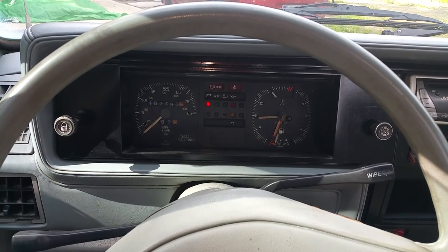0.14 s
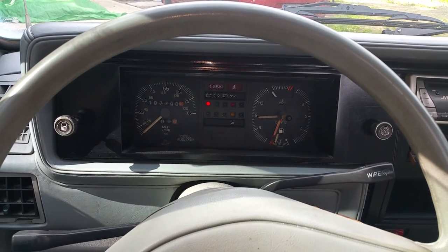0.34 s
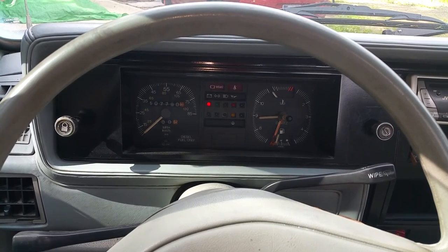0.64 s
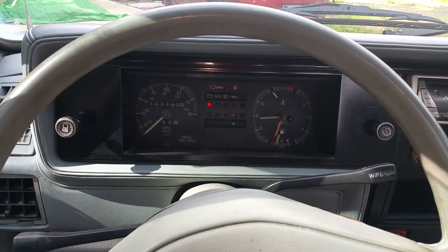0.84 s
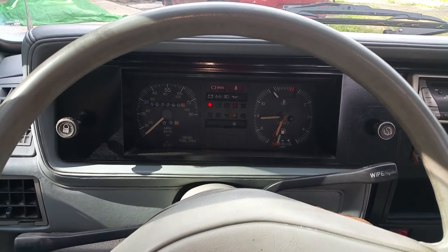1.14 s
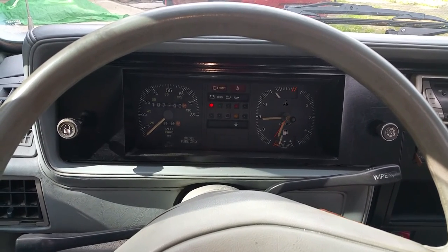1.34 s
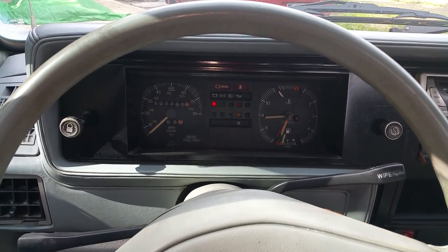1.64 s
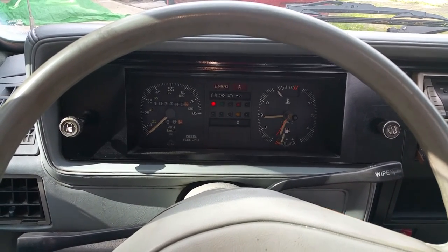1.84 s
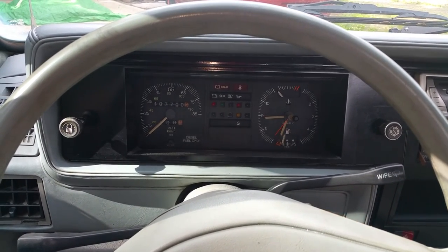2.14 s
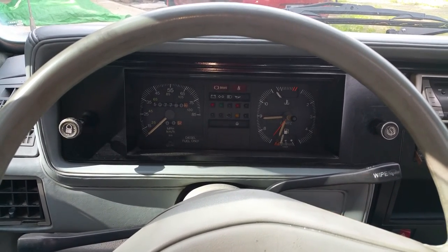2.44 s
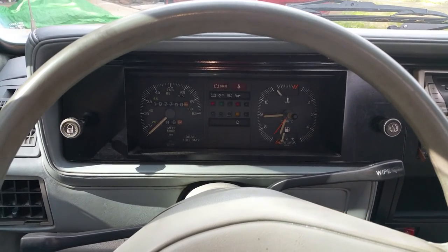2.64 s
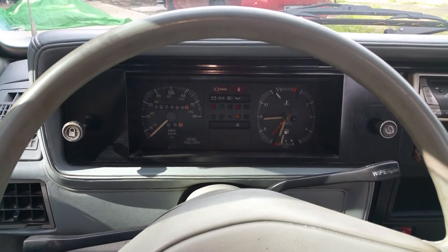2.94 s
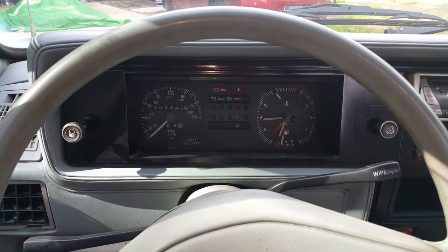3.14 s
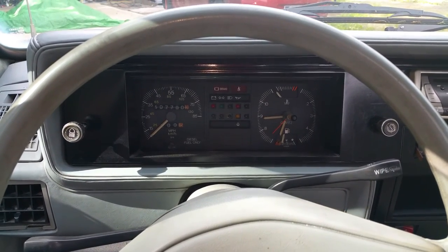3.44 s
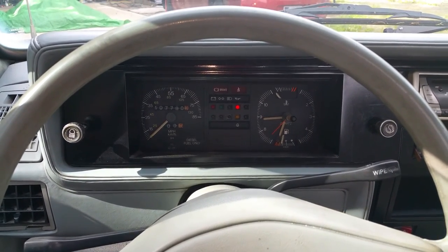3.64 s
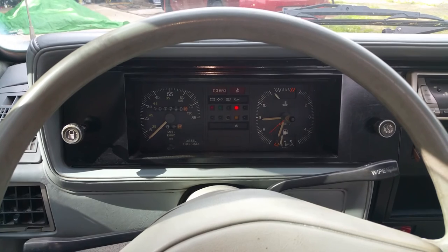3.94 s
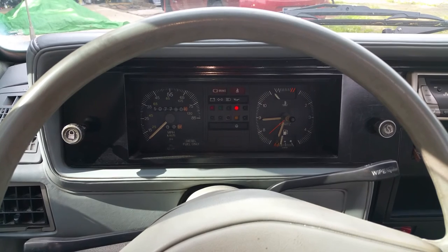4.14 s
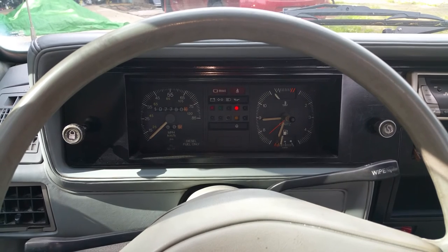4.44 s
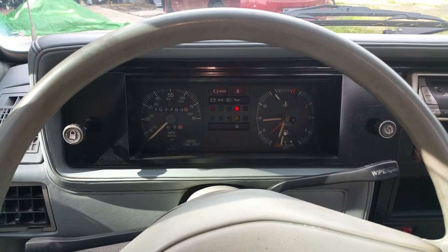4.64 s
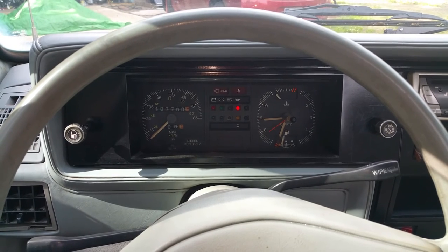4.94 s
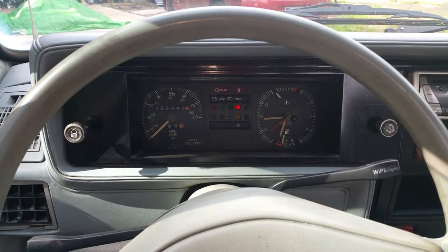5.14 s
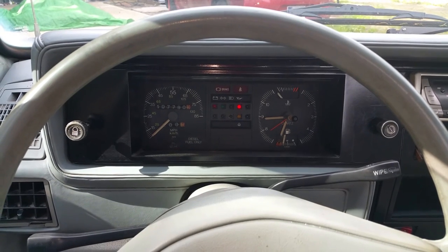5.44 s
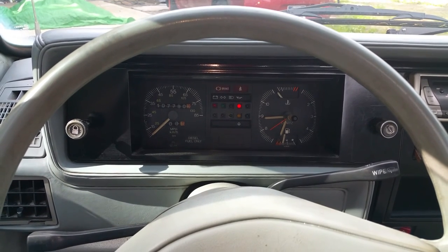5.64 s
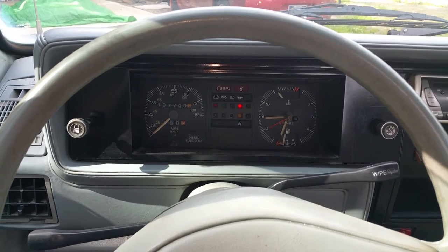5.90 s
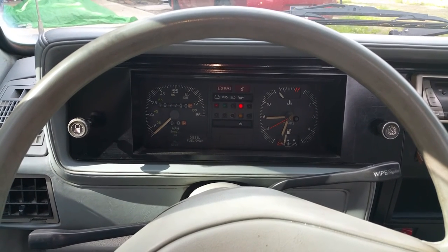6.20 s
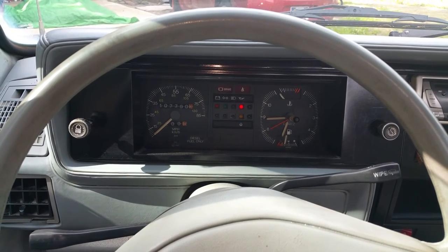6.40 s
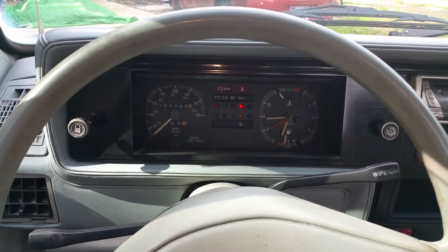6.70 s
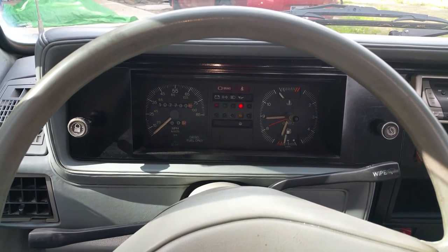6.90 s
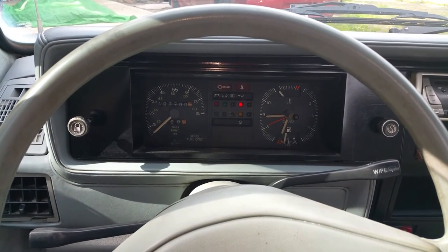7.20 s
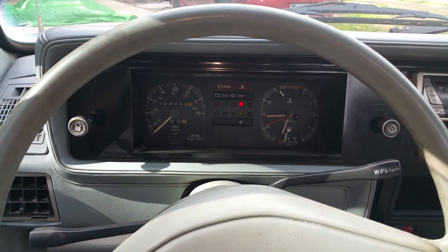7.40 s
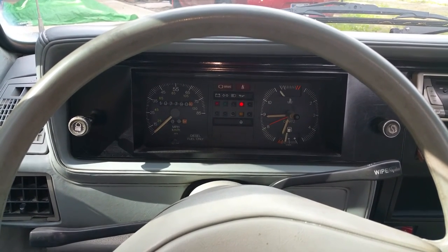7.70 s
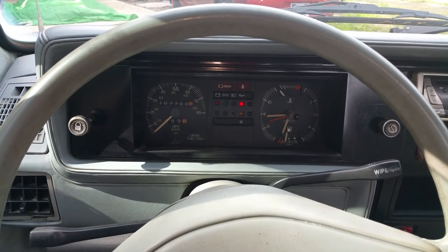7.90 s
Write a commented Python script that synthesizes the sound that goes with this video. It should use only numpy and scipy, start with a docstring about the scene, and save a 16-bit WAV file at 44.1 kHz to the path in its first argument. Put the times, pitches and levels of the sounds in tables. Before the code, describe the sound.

In a quiet car cabin, the ignition key clicks and the starter whirrs briefly. A small diesel engine catches with heavy thumps as the keys jingle lightly. The revs rise with a low boom, clatter and a faint turbo whistle, then fall back and ease into a steady, knocking idle. Everything is heard from the driver's seat, with the key close by and the engine ahead.

```python
"""A small turbo-diesel four starts up, heard from the driver's seat on a two-port microphone.
Close by, the dash clock ticks over a faint far-off hum, the key turns and the loose keys jingle.
The starter whirrs; cranking jolts, then the first firings, thump through the body. Then the firing
orders boom in the cabin over diesel clatter and a turbo whistle while the revs rise, drop and settle."""
import sys
import numpy as np
from scipy import signal
from scipy.fft import rfft, irfft, next_fast_len
from scipy.io import wavfile
from scipy.ndimage import uniform_filter1d

SR = 44100
rng = np.random.default_rng(int(sys.argv[2]) if len(sys.argv) > 2 else 0)


def int16_out(signal):
    """Quantize to a 16-bit WAV file."""
    q = np.round(np.clip(np.atleast_2d(signal).T, -1, 1) * 32767)
    wavfile.write(sys.argv[1], SR, q.astype(np.int16))


N = 355446

# panel resonances and cabin nulls at the seat: f/Hz, width/Hz, lift/dB
PANELS = [(410, 40, -5), (478, 35, 5), (540, 35, -6), (620, 60, 3), (715, 60, 4), (840, 55, -8),
          (930, 90, 6), (1210, 50, -4), (1380, 60, -8), (1445, 40, 3), (1600, 90, 4), (1790, 60, -8),
          (2000, 90, 3), (2060, 40, -4), (2325, 90, -5), (2670, 60, 7), (2840, 60, -6), (2970, 60, -6),
          (3100, 60, 5), (3190, 50, -5), (3295, 70, 5), (3445, 60, -5), (3850, 120, 3), (5600, 70, 5),
          (6225, 120, 6)]
# mechanical noise through the bulkhead: t/s, clatter/dB, body rumble/dB
BULKHEAD = [(1.38, -60, -46), (1.42, -37, -27), (1.47, -46.5, -33.5), (1.55, -49.5, -41),
            (1.62, -44.5, -33.5), (1.7, -45.5, -31), (1.78, -46.5, -27.5), (1.95, -31.5, -49),
            (2.15, -30.5, -37), (2.8, -28, -36.5), (3.4, -32, -38), (3.6, -30.5, -45.5), (5., -32, -40.5),
            (8.06, -32.5, -37.5)]
# turbo speed, lagging the engine: t/s, whistle/Hz
TURBO = [(2.35, 1150), (2.62, 1640), (2.78, 1980), (2.87, 2120), (3.03, 2310), (3.3, 2500), (3.5, 2530),
         (3.75, 2400), (4.0, 2145), (4.14, 2015), (4.35, 1890), (4.85, 1650), (5.2, 1600), (5.85, 1590),
         (6.1, 1520), (6.35, 1440), (6.8, 1250), (7.05, 1180)]


def undb(db):
    return 10 ** (np.asarray(db) / 20)


def curves(rows):
    """Columns of a time table, one value a sample."""
    s, *columns = np.transpose(rows)
    return [np.interp(np.arange(N) / SR, s, c) for c in columns]


def at_hz(hz, points, column=1):
    """Value of a spectrum table on a log frequency axis."""
    points = np.array(points)
    return np.interp(np.log(np.maximum(hz, 1)), np.log(points[:, 0]), points[:, column])


def fade_in(start_s, length_s):
    return np.clip((np.arange(N) / SR - start_s) / length_s, 0, 1)


def attack(t, length_s):
    return np.minimum(t / length_s, 1)


def decay(t, t60):
    return np.exp(-np.log(1000) * t / t60)


def add(out, s, sound):
    i = int(s * SR)
    out[..., i:i + sound.shape[-1]] += sound


def walk(rate):
    """Random levels held 1 / rate s and slewed twice; spread near 1."""
    step = 32
    hold = int(SR / rate / step)
    held = np.repeat(rng.standard_normal(N // (hold * step) + 2), hold)
    slewed = uniform_filter1d(uniform_filter1d(held, hold), hold)
    return 1.3 * np.interp(np.arange(N), step * np.arange(len(held)), slewed)


def resonance_db(hz, peaks):
    return sum(lift / (1 + (2 * (hz - f) / width) ** 2) for f, width, lift in peaks)


def band(hz, centre, width):
    return 1 / (1 + ((hz / centre - centre / hz) / width) ** 2)


def lift_band(x, db, hz, kind):
    part = signal.sosfiltfilt(signal.butter(3, hz, kind, fs=SR, output="sos"), x)
    return x + (undb(db) - 1) * part


def noise(spectrum, peaks=(), drive=None):
    """Common, left and right noise (or a given drive) in one colour, rms 1."""
    hz = np.fft.rfftfreq(N, 1 / SR)
    if drive is None:
        drive = rng.standard_normal((3, N))
    x = irfft(rfft(drive) * undb(at_hz(hz, spectrum) + resonance_db(hz, peaks)), N)
    return x / x.std()


def breathy_tone(rows, response):
    """A tone that wavers in pitch and level, heard only over the span of its table."""
    hz, *levels_db = curves(rows)
    db = sum(levels_db) + at_hz(hz, response)
    on = fade_in(rows[0][0], .03) * (1 - fade_in(rows[-1][0], .03))
    waver, flutter_db = .019 * walk(150), 3.3 * walk(110)
    return on * undb(db + flutter_db) * np.sin(2 * np.pi * np.cumsum(hz * (1 + waver)) / SR)


def cabin_air():
    """The quiet of the cabin, with a far-off hum in it."""
    # noise floor: f/Hz, relative density/dB
    floor = [(15, -13.5), (35, -21.5), (60, -8), (120, -12.5), (170, -20.5), (300, -21.5), (600, -26),
             (1500, -30.5), (4500, -38), (15800, -39.5)]
    # far-off hum: f/Hz, width/Hz, lift/dB
    hum = [(68, 10, 6.5), (97, 11, -4), (131, 26, 13), (206, 21, 10)]
    return noise(floor, hum) * undb(-63 + 0.59 * walk(4.1))


def clicks(rows):
    """Dry bursts of noise ring the modes of lock and dash; the dash answers with a low clunk."""
    # modes of lock and dash: f/Hz, width/Hz, lift/dB
    modes = [(980, 71, 16.5), (1810, 150, 6), (2840, 530, 4.5), (3644, 1100, 6.5), (4300, 200, 2),
             (4900, 180, -0.5), (6340, 260, -2), (6340, 300, 6.5)]
    # edge, knock, body and body overtone of a click: f/Hz, width/ratio
    parts = [(11300, 0.64), (1520, 0.98), (266, 0.078), (486, 0.87)]
    out, t = np.zeros((3, N + SR)), np.arange(SR // 4) / SR
    hz = np.maximum(np.fft.rfftfreq(len(t), 1 / SR), 1)
    colour = undb(resonance_db(hz, modes))
    for s, snap_db, snap_hz, knock_db, body_db, t60 in rows:
        rise = attack(t, 0.0027)
        edge_db = snap_db - 6.5 + 12 * np.log2(snap_hz / 5500)  # higher snaps have more edge
        levels_db = snap_db, edge_db, knock_db, body_db, body_db - 5
        for db, (f, width) in zip(levels_db, [(snap_hz, 0.62), *parts]):
            if f < 600:  # the body is tonal and outlasts the snap
                clunk = np.sin(2 * np.pi * f * (1 + 0.052 * rng.standard_normal()) * t)
                add(out, s, undb(db) * rise * decay(t, 1.6 * t60) * clunk)
                continue
            burst = irfft(rfft(rng.standard_normal((3, len(t)))) * colour * band(hz, f, width), len(t))
            ring = 0
            for mode_hz, _, lift in modes:
                luck, detune = rng.standard_normal(2)
                gain = undb(-12.5 + lift + 3.3 * luck) * band(mode_hz, f, width) ** 2
                ring += gain * np.sin(2 * np.pi * mode_hz * (1 + .01 * detune) * t)
            click = decay(t, t60) * burst / burst.std() + decay(t, 0.92 * t60) * ring
            add(out, s, undb(db) * rise * click)
    return out[:, :N]


def dash_clock():
    """The clock ticks faintly in the dash once a second."""
    # one tick: snap/dB, snap/Hz, knock/dB, body/dB, t60/s
    tick = (-65, 3591, -58.5, -65, 0.092)
    return clicks([(s, *tick) for s in np.arange(0.035, N / SR, 1.0)])


def ignition():
    """Key, lock and relays click at arm's length."""
    # clicks: t/s, snap/dB, snap/Hz, knock/dB, body/dB, t60/s
    contacts = [(1.257, -72, 2500, -51, -53, 0.037), (1.274, -62, 3200, -51.5, -60, 0.11),
                (1.306, -67, 3000, -50, -58, 0.053), (1.3165, -39, 4600, -41.5, -33, 0.082),
                (1.344, -34.5, 5800, -32, -46, 0.075), (1.3675, -48, 6070, -43, -40, 0.061),
                (1.384, -52, 5000, -53, -47, 0.082), (1.4, -53, 5000, -38.5, -48, 0.049),
                (1.4132, -60, 3000, -31.5, -27.5, 0.05), (1.555, -59, 5300, -60, -51.5, 0.11),
                (1.6758, -66, 4040, -41.5, -38.5, 0.088), (1.8707, -29.5, 5100, -24.5, -27.5, 0.1),
                (1.885, -30, 3400, -23.5, -26.5, 0.041), (1.9348, -46, 5000, -36, -35, 0.15),
                (1.961, -38, 5560, -33, -30.5, 0.11), (1.985, -47, 4000, -40, -32, 0.071),
                (2.06, -49, 5930, -36, -30, 0.11), (2.07, -48, 6000, -40.5, -39, 0.18),
                (2.0941, -40, 5200, -29, -22.5, 0.049), (2.1073, -35, 4590, -36, -36, 0.082),
                (2.14, -57.5, 5500, -52, -45, .15), (2.185, -57, 5500, -49.5, -44.5, .12),
                (2.234, -50.5, 4500, -52, -35.5, 0.1), (2.262, -53, 3960, -41, -42.5, 0.036)]
    return clicks(contacts)


def keys():
    """Loose keys ring where they touch; each touch favours other modes, and fingers damp most."""
    # modes of the keys: f/Hz, level/dB, t60/s
    modes = [(5440, -6, .1), (6300, 2, .05), (6980, 6, 0.13), (7860, -8, .1), (8620, -5, 0.12),
             (10070, -1, 0.2), (10800, 5, .06), (11480, 2, .04), (12680, -2, .22), (13890, -1, 0.17),
             (14220, -2, .1)]
    # keys touch: t/s, level/dB, ring time/ratio
    touches = [(1.345, -64, .3), (1.871, -54, .3), (1.937, -64, .5), (1.958, -50.5, 1.2), (2.066, -47, .25),
               (2.108, -48, 0.26)]
    out, t = np.zeros((3, N)), np.arange(SR // 4) / SR
    for s, db, free in touches:
        for (hz, mode_db, t60), (luck, detune) in zip(modes, rng.standard_normal((len(modes), 2))):
            phase = 0.49 * rng.standard_normal((3, 1))
            tone = np.sin(2 * np.pi * hz * (1 + 0.0034 * detune) * t + phase)
            add(out, s, undb(db + mode_db + 1.5 * luck) * tone * decay(t, t60 * free) * attack(t, 0.0018))
    return out


def valve_gear(firings):
    """Valves, injectors and gears strike alike every four firings; the pattern drifts slowly."""
    size = 2048
    patterns = irfft(np.exp(2j * np.pi * rng.random((2, 3, size // 2 + 1))), size)
    place = firings / 4 % 1 * size
    first, second = ([np.interp(place, np.arange(size), p, period=size) for p in trio]
                     for trio in patterns)
    drift = 0.72 * walk(3.185)
    drive = np.cos(drift) * first + np.sin(drift) * second
    return drive / drive.std()


def clatter(firing_hz, firings):
    """Each firing knocks and dies into the valve-gear noise; revs and turbo speed tilt the treble."""
    # diesel clatter: f/Hz, relative density/dB
    spectrum = [(150, -28.5), (250, -11), (350, -12.5), (600, -15), (850, -19), (1350, -22.5), (2000, -28),
                (2750, -34), (3500, -41.5), (4400, -50), (7000, -53.5), (9000, -60), (15800, -61)]
    # knock of each cylinder: level/dB
    cylinders = [1.5, -2, -1.5, -3]
    # colour against engine speed: firing rate/Hz, brightness/dB, added rasp/dB
    colour = [(9.55, -5, 10.5), (13.4, 4, 11), (34, -2.5, 14), (41.4, -9, 15), (52.1, -1, -0.5),
              (56.3, 1, -2), (70, -1, 0)]
    # the rasp opens with the revs, dips at the fuel cut and swells once more: t/s, lift/dB
    rasp = [(2.3, 1.5), (2.65, 0.5), (2.9, 5), (3.3, 6.5), (3.52, 0.5), (3.62, 3.5), (3.85, 5),
            (3.98, -0.5), (4.4, -.5), (8.06, 0)]
    repeat = 0.3  # share of the power that comes back alike in every cycle
    drive = np.sqrt(repeat) * valve_gear(firings) + np.sqrt(1 - repeat) * rng.standard_normal((3, N))
    count = firings.astype(int)
    strength = undb(rng.standard_normal(count[-1] + 1)[count] + np.take(cylinders, count, mode="wrap"))
    pulses = uniform_filter1d(1 + 0.52 * strength * np.exp(-(firings % 1) / 1.4), 40)
    x = noise(spectrum, PANELS, drive * pulses * undb(0.68 * walk(25)))
    boost = (curves(TURBO)[0] / 2830) ** 2.8
    x = lift_band(x, at_hz(firing_hz, colour) + 5 * boost, 1250, "high")
    x = lift_band(x, at_hz(firing_hz, colour, column=2) - 5.5 * boost, 3280, "high")
    return lift_band(x * undb(curves(BULKHEAD)[0]), curves(rasp)[0], (3350, 4500), "band")


def rumble():
    """The working engine shakes the body around the seat."""
    # body rumble: f/Hz, relative density/dB
    spectrum = [(8.8, -36), (15, -11), (59, -6.5), (78, 0.5), (102, 1), (197, -4), (255, -22), (294, -3.5),
                (348, -15), (450, -24), (580, -45), (990, -120)]
    return noise(spectrum) * undb(curves(BULKHEAD)[1])


def hard_knocks():
    """Single hard engine knocks, from starter engagement onward: short bursts that ring the block."""
    # knocks: t/s, level/dB
    blows = [(1.402, -32.5), (1.678, -38.5), (1.714, -29), (1.744, -23.5), (1.79, -21.5), (1.842, -20),
             (1.9, -25), (1.933, -23.5), (1.986, -25.5), (2.024, -29), (2.051, -31), (2.095, -31),
             (2.18, -35.5), (3.569, -29.5), (4.997, -34.5), (7.842, -36)]
    # ring of the block: f/Hz, relative density/dB
    spectrum = [(150, -8.5), (350, 11), (600, -10), (980, -3.5), (1350, -7), (1950, -10), (2800, -26.5),
                (4500, -32.5), (9000, -51), (15800, -58.5)]
    envelope, t = np.zeros(N), np.arange(SR // 8) / SR
    for s, db in blows:
        add(envelope, s, undb(db) * np.exp(-t / 0.021) * attack(t, 0.0012))
    return envelope * noise(spectrum, PANELS)


def starter():
    """The pinion whirrs on the ring gear with a stack of overtones."""
    # gear mesh, sagging as a piston is hauled through compression: t/s, f/Hz, level/dB
    mesh = [(1.43, 300, -52), (1.47, 322, -49), (1.55, 324, -54), (1.585, 264, -54), (1.61, 262, -50),
            (1.635, 335, -52), (1.67, 305, -53), (1.7, 320, -56)]
    # colour of the housing: f/Hz, gain/dB
    housing = [(260, 3), (330, 5), (520, -1), (680, 2), (800, -2), (980, 0), (1060, -2), (1300, -10),
               (1570, -4), (1680, -14), (2000, -24)]
    return sum(breathy_tone(np.array(mesh) * [1, k, 1], housing) for k in range(1, 7))


def start_thumps():
    """Cranking jolts, then the first firings, shake the body: a low ring, its overtone, a slow heave."""
    # thumps: t/s, level/dB, f/Hz
    thumps = [(1.431, -28.5, 54.6), (1.452, -23, 61), (1.499, -23, 74), (1.571, -25.5, 53.4),
              (1.597, -30, 98.5), (1.711, -14.5, 61), (1.741, -11.5, 86.4), (1.782, -9.5, 100),
              (1.817, -7.5, 75), (1.841, -6.5, 103), (1.867, -7, 67.6), (1.901, -6.5, 88),
              (1.922, -10.5, 62.4), (1.95, -7, 77.3), (1.969, -8.5, 103), (1.987, -11, 80.3),
              (2.021, -8.5, 93.4), (2.048, -6.5, 78.6), (2.067, -4.5, 83.7)]
    out, t = np.zeros(N), np.arange(SR // 4) / SR
    for s, db, hz in thumps:
        ring = -np.sin(2 * np.pi * hz * t) * (t / 0.0069) * np.exp(1 - t / 0.0068)
        overtone = -.45 * np.sin(2 * np.pi * 1.6 * hz * t) * np.exp(-t / 0.021)
        heave = 0.084 * np.sin(2 * np.pi * 25 * t) * np.exp(-t / .05)
        add(out, s, undb(db) * (ring + overtone + heave) * attack(t, 0.0019))
    return out


def cabin_boom(firing_hz, firings, load):
    """Five firing orders boom in the cabin, each as loud as its pitch and the load make it."""
    # boom under load: f/Hz, level/dB
    loaded = [(42, -25.5), (60, -17.5), (68, -17), (71.5, -13), (75, -17.5), (107, -18.5), (128, -19),
              (137, -12), (143, -23), (149, -18.5), (160, -24.5), (186, -13.5), (202, -21.5), (214, -20),
              (226, -21.5), (248, -34), (265, -27), (283, -24), (297, -16), (310, -21), (336, -27),
              (356, -33), (372, -40.5)]
    # boom off load: f/Hz, level/dB
    unloaded = [(51, -27), (55, -27.5), (59, -23), (63, -21.5), (68, -23), (105, -50.5), (118, -41),
                (125, -35.5), (136, -22), (156, -55), (161, -35.5), (165, -33), (170, -36.5), (178, -27.5),
                (190, -24.5), (202, -31), (220, -30), (238, -34.5), (250, -41), (268, -32.5), (280, -26.5),
                (295, -19.5), (303, -16), (312, -26.5), (340, -30)]
    # orders one to five: gain/dB
    orders = [0, 0, 0, -5, -17]
    # the third order thins out towards idle: t/s, gain/dB
    third = [(6.72, 0), (6.8, -12)]
    out = 0
    for order, db in enumerate(orders, 1):
        hz = order * firing_hz
        db += load * at_hz(hz, loaded) + (1 - load) * at_hz(hz, unloaded)
        if order == 3:
            db += curves(third)[0]
        flutter_db = 0.58 * walk(12) + 0.78 * walk(45)
        phase = 2 * np.pi * order * firings + 0.51 * walk(6) + 0.52 * (order - 1) ** 2
        out += np.sqrt(2) * undb(db + flutter_db) * np.cos(phase)
    return out


def uneven_orders(firing_hz, firings):
    """Unequal cylinders add wandering orders between and above the main five."""
    # quarter, half and upper whole orders: f/Hz, level/dB
    spectrum = [(14, -56.5), (28, -39.5), (42, -59), (60, -41), (90, -44), (130, -39.5), (160, -42),
                (200, -38.5), (250, -55.5), (290, -36), (330, -51), (365, -51), (410, -52), (455, -53),
                (484, -47), (520, -55), (550, -56), (590, -48.5), (625, -52), (660, -57.5), (710, -48),
                (760, -50.5), (830, -61), (925, -58), (1000, -62), (1150, -68.5), (1400, -76.5)]
    # low orders grow with the revs: f/Hz, slope/(dB per Hz of firing rate)
    growth = [(300, .5), (600, 0.45), (1000, -0.26)]
    step, out = 8, 0  # low tones, built at an eighth of the sample rate
    firing_hz, firings = firing_hz[::step], firings[::step]
    for quarter, phase in zip(range(1, 80), rng.random((80, 3, 1))):
        if quarter % 4 or quarter > 20:
            hz = firing_hz * quarter / 4
            lift_db = (2.5, 0.5, 0, 0.5)[quarter % 4]  # whole orders stand out most
            db = at_hz(hz, spectrum) + at_hz(hz, growth) * (firing_hz - 60) + lift_db
            out += undb(db + 2 * walk(3)[::step]) * np.sin(2 * np.pi * (firings * quarter / 4 + phase))
    return signal.resample_poly(out, step, 1, axis=1)[:, :N]


def cylinder_slap(firings, load):
    """Under load one cylinder slaps harder once a cycle and rings four panels."""
    # panel modes: f/Hz, level/dB, t60/s, delay/s
    modes = [(591, -36.5, 0.13, 0.00081), (940, -28.5, .09, 0.0073), (361.6, -31, 0.39, 0.0035),
             (330, -29, 0.11, .004)]
    # strength of the slap while revving: t/s, level/dB
    strength = [(2.1, -7.5), (2.55, -5), (2.7, -2), (2.9, 1.5), (3.1, -3), (3.2, -5), (3.55, -10)]
    slap_s, scatter_db = 2.7, 2.5  # time of one slap; spread of their strength
    cycle = np.floor((firings - firings[int(slap_s * SR)]) / 4)
    effort = load * undb(curves(strength)[0] + scatter_db * rng.standard_normal(N))
    blows = np.diff(cycle, prepend=cycle[0]) * effort
    out, t = 0, np.arange(SR // 4) / SR
    for hz, db, t60, delay_s in modes:
        since = np.maximum(t - delay_s, 0)
        ring = np.sin(2 * np.pi * hz * since) * decay(since, t60) * attack(since, 0.0035)
        out += undb(db) * signal.fftconvolve(blows, ring)[:N]
    return out


def turbo_whistle():
    """The turbo spools up behind the revs and runs down, whistling through the bulkhead."""
    # whistle as the bulkhead lets it through: f/Hz, level/dB
    response = [(1150, -57), (1260, -49), (1330, -48), (1380, -53), (1440, -41), (1490, -47), (1540, -45),
                (1590, -46), (1605, -49), (1650, -46.5), (1760, -56), (1880, -51), (1980, -44.5),
                (2050, -42.5), (2150, -44), (2230, -48), (2320, -54), (2450, -53), (2530, -50)]
    return breathy_tone(TURBO, response)


def stray_knocks(firing_hz, firings, load):
    """Off load each firing adds a short knock; a few stand out of the clatter, more so at low revs."""
    # stray knock: f/Hz, relative density/dB
    spectrum = [(300, -22), (700, -7), (1000, -0.5), (1600, -1), (2600, -1.5), (3500, -17), (5000, -31.5),
                (15800, -52.5)]
    loud_at = int(7.288 * SR)  # one firing of the cylinder that knocks loudest
    firings = firings + 1 - firings[loud_at] % 1 + .01
    count = firings.astype(int)
    loud_cylinder = (count - count[loud_at]) % 4 == 0
    luck = np.minimum(rng.exponential(size=count[-1] + 1), 2.2)[count]
    db = -55.5 + 4 * luck - 0.65 * (firing_hz - 55) + 6.5 * loud_cylinder + 2.3 * walk(4)
    since = firings % 1 / firing_hz
    envelope = np.exp(-since / 0.016) * attack(since, 0.0038)
    return (1 - load) * undb(db) * envelope * noise(spectrum, PANELS)


def engine():
    """Clatter and rumble set in with the cranking; the orders join as the engine runs free."""
    # cranking and catching: t/s, firing rate/Hz
    cranking = [(1.4, 8.8), (1.68, 9.8), (1.75, 19), (1.9, 34), (2.0, 36.7)]
    # running free: t/s, firing rate/Hz
    revs = [(2.06, 41.5), (2.14, 52.15), (2.19, 59), (2.26, 63.12), (2.39, 68.85), (2.59, 73.37),
            (3.04, 75.08), (3.5, 70.7), (4.0, 61.5), (4.151, 60.8), (4.78, 58.81), (5.67, 59.39),
            (5.92, 58.27), (6.75, 53.87), (7.06, 51.32), (7.44, 52.51), (7.66, 54.1), (8.06, 54.1)]
    # fuel, full while revving, then cut; the governor feeds a little back at idle: t/s, load/share
    fuel = [(2.06, 1.), (3.545, 1), (3.575, 0), (6.9, 0), (7.6, 0.02)]
    firing_hz, load = curves(cranking + revs)[0], curves(fuel)[0]
    firings = np.cumsum(firing_hz) / SR
    boom = cabin_boom(firing_hz, firings, load)
    mechanical = clatter(firing_hz, firings) + rumble()
    orders = boom + uneven_orders(firing_hz, firings)
    blows = cylinder_slap(firings, load) + stray_knocks(firing_hz, firings, load)
    return mechanical * fade_in(1.385, 0.044) + (orders + blows) * fade_in(2.05, 0.052)


def microphone_ports(common, left, right):
    """Both ports share part of a sound; its treble reaches the left one late; the rest differs."""
    # balance at the seat: f/Hz, left minus right/dB
    balance = [(60, 6.0), (110, 6.5), (200, 8.5), (380, 4), (700, 3.5), (1290, 6), (2380, 9.5),
               (4400, -0.5), (8120, -1.5), (15000, 7)]
    # sound common to both ports: f/Hz, power/share
    coherence = [(60, 0.95), (300, 0.93), (640, 0.51), (1500, 0.38), (4000, 0.12), (15000, 0.07)]
    lag_s, lag_from_hz = 0.00038, 710
    size = next_fast_len(N + SR)
    hz = np.fft.rfftfreq(size, 1 / SR)
    alike, lean = at_hz(hz, coherence), undb(at_hz(hz, balance) / 2)
    late = np.exp(-2j * np.pi * hz * lag_s / (1 + (lag_from_hz / np.maximum(hz, 1)) ** 4))
    shared, own = np.sqrt(alike) * rfft(common, size), np.sqrt(1 - alike)
    left_port = (shared * late + own * rfft(left, size)) * lean
    right_port = (shared + own * rfft(right, size)) / lean
    return irfft([left_port, right_port], size)[:, :N]


def scene():
    """Engine bay ahead, dash and keys close by, all picked up at the driver's seat."""
    air = cabin_air()
    engine_bay = engine() + start_thumps() + hard_knocks() + turbo_whistle() + starter()
    dash = dash_clock() + ignition() + keys()
    return microphone_ports(*(air + engine_bay + dash))


def record(dry):
    """The microphone rounds the loudest peaks and cuts the top."""
    top_cut = signal.ellip(10, .2, 70, 15830, fs=SR, output="sos")
    return signal.sosfilt(top_cut, np.tanh(0.61 * dry) / 0.78)


dry = scene()
out = record(dry)
int16_out(out)
```